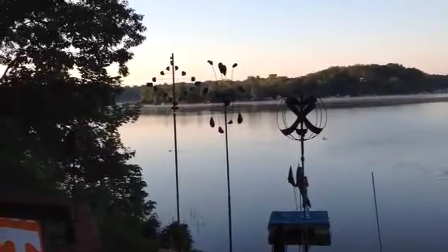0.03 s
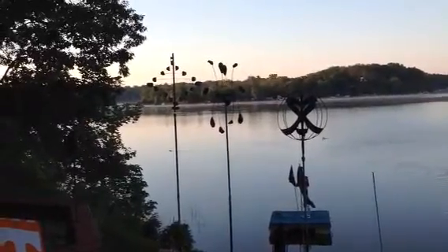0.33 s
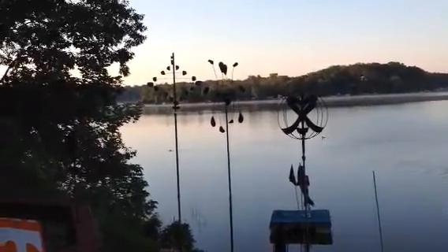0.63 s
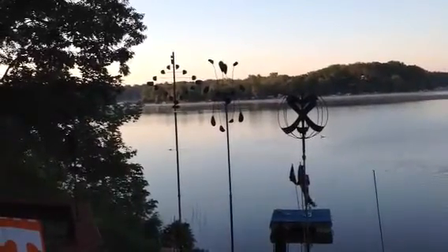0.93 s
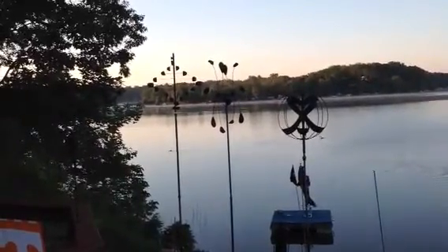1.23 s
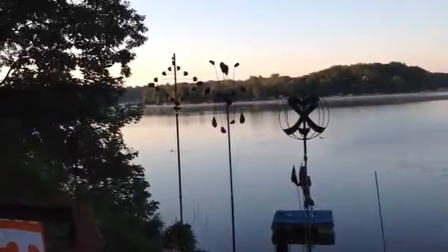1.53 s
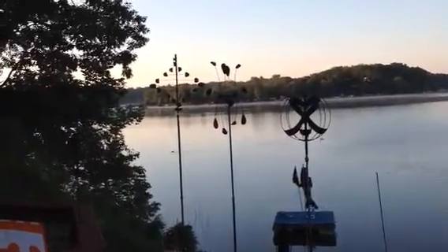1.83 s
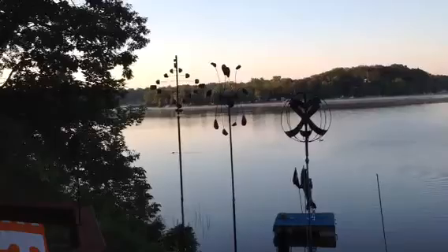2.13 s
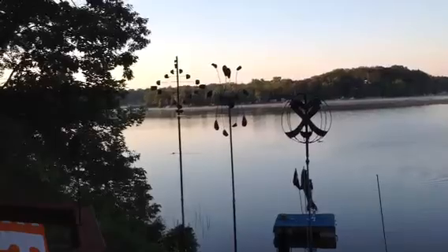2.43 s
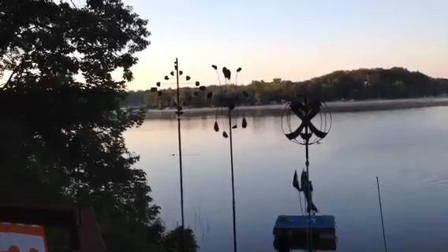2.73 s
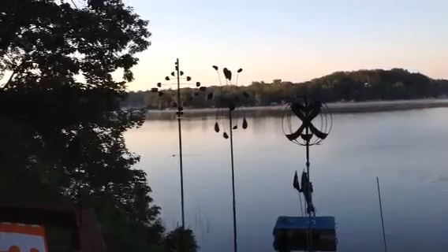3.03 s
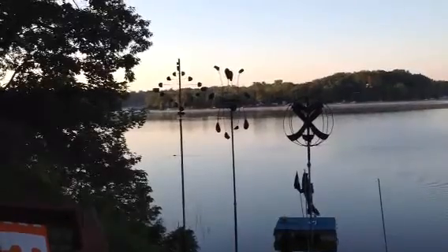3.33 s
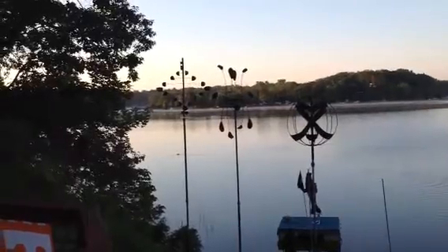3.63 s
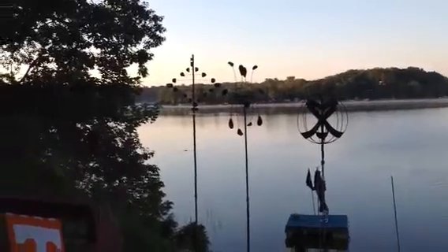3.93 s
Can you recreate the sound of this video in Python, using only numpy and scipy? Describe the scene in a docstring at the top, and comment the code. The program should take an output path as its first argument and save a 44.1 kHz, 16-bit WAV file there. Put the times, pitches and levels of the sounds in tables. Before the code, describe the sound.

A loon's clear, falling wail echoes faintly over a quiet lake, heard from the bank. A quick run of high chirps overlaps its end. The loon then calls again, rising, with a brief rustle and a close chirp.

```python
"""A loon on a calm lake

A loon wails in a nearly pure harmonic tone that sinks, breaks to its lower register and stops, then
starts again and breaks upward; the shores return faint echoes. Small birds chip and whistle in rapid
frequency sweeps, scattered by the trees, and something rustles briefly near the end.
Beneath lie three bands of noise: a soft distant wash, a growing rumble and a faint even hiss."""
import sys
import numpy as np
from scipy import signal
from scipy.fft import rfft, irfft
from scipy.io import wavfile

SR = 44100
rng = np.random.default_rng(int(sys.argv[2]) if len(sys.argv) > 2 else 0)


def int16_out(signal):
    """Quantize to a 16-bit WAV file."""
    q = np.round(np.clip(np.atleast_2d(signal).T, -1, 1) * 32767)
    wavfile.write(sys.argv[1], SR, q.astype(np.int16))


N = 176400
TIME = np.arange(N) / SR

# Noise spectra: (frequency [Hz], relative spectral density [dB])
WASH_SPECTRUM = [(30, -39), (60, -22), (110, -14), (185, 1.5), (250, -4), (330, -2), (480, -7.5), (800, 0),
                 (1200, -7.5), (2000, -17), (4000, -46)]
RUMBLE_SPECTRUM = [(30, -44), (80, -21.5), (145, 1.5), (220, -5.5), (290, 1.5), (450, -8), (900, -15.5),
                   (2000, -46)]
RUSTLE_SPECTRUM = [(40, -33), (150, -4), (400, 2), (1300, 0.5), (2200, -2.5), (3600, -7), (6000, -13.5),
                   (10000, -14), (15000, -28)]
HISS_SPECTRUM, HISS_DB = [(100, -18.5), (2000, -0.5), (4000, 0), (9000, -0.5), (15000, -3)], -66.5
# Noise envelopes: (time [s], level [dB])
WASH_ENVELOPE = [(0, -64), (1.3, -63.5), (2.2, -63), (3.3, -63), (4, -61.5)]
RUMBLE_ENVELOPE = [(0, -81), (2.3, -75.5), (3.1, -68.5), (3.6, -62.5), (4, -59.5)]
RUSTLE_ENVELOPE = [(3.84, -85), (3.88, -61), (3.903, -49.5), (3.915, -54), (3.935, -57), (3.943, -49),
                   (3.955, -62), (3.98, -65), (4, -48)]

# Quick chips and thin whistles: (onset [s], duration [s], reference frequency [Hz], level [dB])
CHIP_CALLS = [(1.475, 0.056, 7750, -46.5), (1.603, .056, 7660, -46.5), (1.726, .055, 7647, -46),
              (1.795, .059, 7910, -44.5), (1.860, .048, 7220, -46.5), (1.891, 0.044, 7360, -46.5)]
WHISTLE_CALLS = [(.752, 0.11, 8590, -63), (1.015, .05, 7800, -67), (3.072, 0.12, 8690, -62.5)]
# A chip climbs, levels off and snaps down; a whistle holds, then sags:
# (time [share of duration], frequency [share of reference], relative level [dB])
CHIP_CONTOUR = [(0, .82, -17), (0.081, .86, -5.5), (0.418, 0.96, -3), (.68, 0.97, -5), (0.871, .98, -6.5),
                (.94, 0.77, -11), (1, .63, -22)]
WHISTLE_CONTOUR = [(0, .99, -7.5), (.17, 1, -5), (.42, 0.98, -6), (.65, .94, -4.5), (.85, .87, -8),
                   (1, .83, -8)]
# One arched chirp close by: (time [s], frequency [Hz], level [dB])
NEAR_CHIRP_CURVE = [(3.942, 5400, -51), (3.948, 5860, -41.5), (3.954, 5980, -39.5), (3.96, 6180, -48),
                    (3.968, 5980, -35.5), (3.981, 5700, -40.5), (3.987, 4910, -55.5), (3.991, 3730, -45.5),
                    (3.998, 3000, -54)]

# Upper-register loon notes: (time [s], frequency [Hz], level [dB], third-harmonic level [dB])
LOON_UPPER_NOTES = [
    [(0, 913, -36, -76), (.09, 909, -36, -68), (.14, 912, -39, -66.5), (.36, 916, -41, -77.5),
     (.52, 911, -39.5, -66.5), (.68, 910.5, -36.5, -72), (.81, 901.7, -34.5, -71.5), (.94, 890, -34, -65),
     (1.0, 885.5, -35.5, -71.5), (1.11, 880, -39, -68.5), (1.17, 875, -49.5, -70.5),
     (1.295, 865.5, -55, -71.5), (1.335, 860, -44.5, -77), (1.46, 847, -45.5, -89),
     (1.535, 845, -41.5, -86), (1.58, 815, -68, -95)],
    [(3.825, 770, -55, -95), (3.838, 784, -41.5, -85), (3.85, 835, -44.5, -66), (3.926, 860, -47.5, -61.5),
     (4.0, 873, -43.5, -56.5)],
]
# Lower-register loon notes: (time [s], frequency [Hz], level [dB])
LOON_LOWER_NOTES = [
    [(1.49, 701, -60), (1.53, 706, -52.5), (1.552, 695, -37), (1.646, 688, -37), (1.736, 671.5, -41),
     (1.765, 686, -65)],
    [(3.33, 470.3, -72), (3.44, 518, -59.5), (3.47, 581, -59), (3.492, 655, -53), (3.535, 669.5, -42),
     (3.8, 712, -40.5), (3.838, 728, -38.5), (3.86, 750, -56)],
]
# For each lower note, relative to the fundamental: (harmonic 2 [dB], harmonic 3 [dB], harmonic 4 [dB])
LOWER_HARMONICS_DB = [
    [-30.5, -48, -51],
    [-27, -36.5, -40],
]
# Upper-register harmonics 2 and 4 to 8, relative to the fundamental at TOP_HZ
UPPER_SECOND_DB, UPPER_HIGH_DB = -38.5, [-43.5, -51, -47.5, -47, -44]
TOP_HZ, DULLING_DB_PER_HZ = 912, 0.9   # harmonics 4 to 8 weaken as the pitch sinks
# Reflections from the shores: (delay [s], gain [dB])
SHORE_REFLECTIONS = [(.04, -30), (.095, -23.5), (.29, -34)]


def from_db(db):
    """The decibel scale: 20 dB is a tenfold amplitude."""
    return 10 ** (np.asarray(db) / 20)


def unit_rms(x):
    """Normalisation to unit mean power."""
    return x / np.sqrt(np.mean(x ** 2) + 1e-20)


def drift(rate_hz):
    """Random modulation: white noise through a two-pole low-pass, at unit rms."""
    pole = np.exp(-2 * np.pi * rate_hz / SR)
    wander = signal.lfilter([1], [1, -2 * pole, pole * pole], rng.standard_normal(N + SR))
    return unit_rms(wander[SR:])


def coloured_noise(spectrum):
    """Spectral shaping: white noise weighted by frequency, at unit rms."""
    hz, db = np.transpose(spectrum)
    bin_hz = np.maximum(np.fft.rfftfreq(N, 1 / SR), 1)
    gain = from_db(np.interp(np.log(bin_hz), np.log(hz), db))
    return unit_rms(irfft(rfft(rng.standard_normal(N)) * gain, N))


def envelope(curve):
    """Exponential growth and decay: straight lines in decibels between points."""
    times, db = np.transpose(curve)
    return from_db(np.interp(TIME, times, db))


def bird_tone(curve, overtones, jitter=0.0091, shimmer_db=3.5, waver_hz=204):
    """Additive synthesis: partials share one phase, with jitter in pitch and shimmer in level."""
    times, hz, db = np.transpose(curve)
    pitch = np.interp(TIME, times, hz) * (1 + jitter * drift(waver_hz))
    gate = np.clip(np.minimum(TIME - times[0], times[-1] - TIME) / .002 + 1, 0, 1)   # 2 ms ramps
    level = gate * from_db(np.interp(TIME, times, db) + shimmer_db * drift(waver_hz))
    phase = 2 * np.pi * np.cumsum(pitch) / SR
    partials = sum(from_db(gain_db) * np.sin(ratio * phase) for ratio, gain_db in [(1, 0), *overtones])
    return np.sqrt(2) * level * partials


def scatter(x, t60_s):
    """Diffuse reverberation: convolution with exponentially decaying noise of unit energy."""
    t = np.arange(SR) / SR
    tail = rng.standard_normal(SR) * from_db(-60 * t / t60_s) * np.minimum(t / .004, 1)
    return signal.fftconvolve(x, tail / np.sqrt(np.sum(tail ** 2)))[:N]


def background(surge_db=2, surge_hz=5):
    """Incoherent addition: the powers of a distant wash, an uneven rumble and a steady hiss sum."""
    surge = from_db(surge_db * drift(surge_hz))
    rumble = envelope(RUMBLE_ENVELOPE) * surge * coloured_noise(RUMBLE_SPECTRUM)
    wash = envelope(WASH_ENVELOPE) * coloured_noise(WASH_SPECTRUM)
    hiss = from_db(HISS_DB) * coloured_noise(HISS_SPECTRUM)
    return wash + rumble + hiss


def rustle(rough_db=1.0, flutter_hz=150):
    """Rapid amplitude modulation roughens a short burst of broadband noise."""
    flutter = from_db(rough_db * drift(flutter_hz))
    return envelope(RUSTLE_ENVELOPE) * flutter * coloured_noise(RUSTLE_SPECTRUM)


def calls(rows, contour, octave_db):
    """Time and frequency scaling: one contour is stretched and transposed for each call."""
    curves = [np.array(contour) * [length, hz, 1] + [onset, 0, db] for onset, length, hz, db in rows]
    return sum(bird_tone(curve, [(2, octave_db)]) for curve in curves)


def small_birds():
    """The direct-to-reverberant ratio marks distance: calls in the trees ring more than a near chirp."""
    chips = calls(CHIP_CALLS, CHIP_CONTOUR, octave_db=-25.5)
    whistles = calls(WHISTLE_CALLS, WHISTLE_CONTOUR, octave_db=-38)
    near = bird_tone(NEAR_CHIRP_CURVE, [(2.027, -11.5)])   # one overtone, just above the octave
    into_trees = chips + whistles + from_db(-6.5) * near
    branches = from_db(1) * scatter(into_trees, t60_s=0.37)
    wood = from_db(-8) * scatter(into_trees, t60_s=.6)
    return chips + whistles + near + branches + wood


def loon_note(curve, harmonics_db, fade_db=2.5, fade_hz=13.6):
    """A harmonic series on a nearly steady fundamental; each overtone swells and fades independently."""
    overtones = [(k, db + fade_db * drift(fade_hz)) for k, db in enumerate(harmonics_db, 2)]
    return bird_tone(curve, overtones, jitter=0.0014, shimmer_db=.5, waver_hz=29.7)


def loon():
    """Register breaks make the wail's pitch jump; reflection from the shores adds delayed copies."""
    voice = sum(map(loon_note, LOON_LOWER_NOTES, LOWER_HARMONICS_DB))
    for curve in LOON_UPPER_NOTES:
        times, hz, db, third_db = np.transpose(curve)
        dulling_db = DULLING_DB_PER_HZ * (TOP_HZ - np.interp(TIME, times, hz))
        relative_third_db = np.interp(TIME, times, third_db - db)
        high_db = [top_db - dulling_db for top_db in UPPER_HIGH_DB]
        harmonics_db = [UPPER_SECOND_DB, relative_third_db, *high_db]
        voice = voice + loon_note(np.column_stack([times, hz, db]), harmonics_db)
    echoes = sum(from_db(db) * np.interp(TIME - delay, TIME, voice, left=0)
                 for delay, db in SHORE_REFLECTIONS)
    lake = from_db(-24) * scatter(voice, t60_s=.7)
    return voice + echoes + lake


def scene():
    """Superposition: the pressures of all sources add at one point on the shore."""
    return (loon() + small_birds() + background() + rustle())[None, :]


def record(dry, cutoff_hz=15250):
    """Band limiting: an elliptic low-pass cuts the highest treble steeply."""
    return signal.sosfilt(signal.ellip(12, .1, 80, cutoff_hz, fs=SR, output="sos"), dry)


dry = scene()
out = record(dry)
int16_out(out)
```